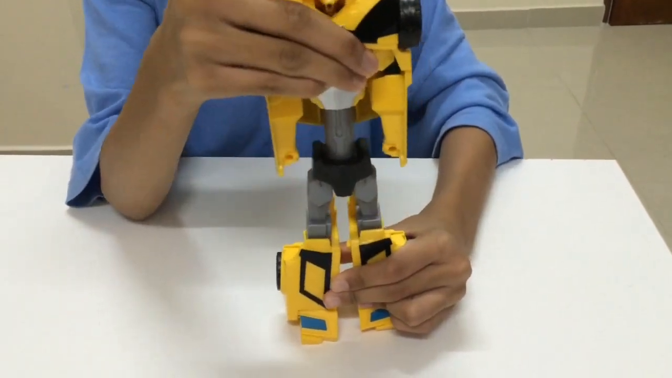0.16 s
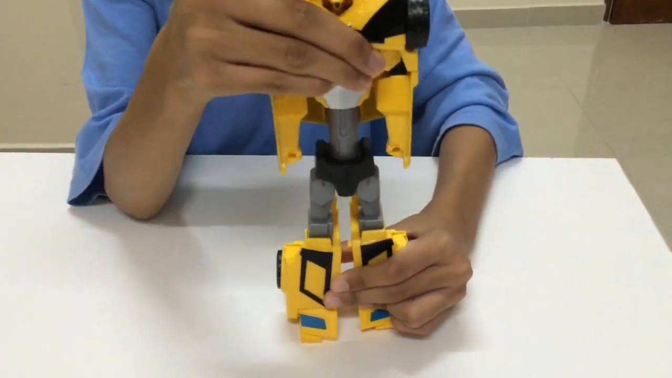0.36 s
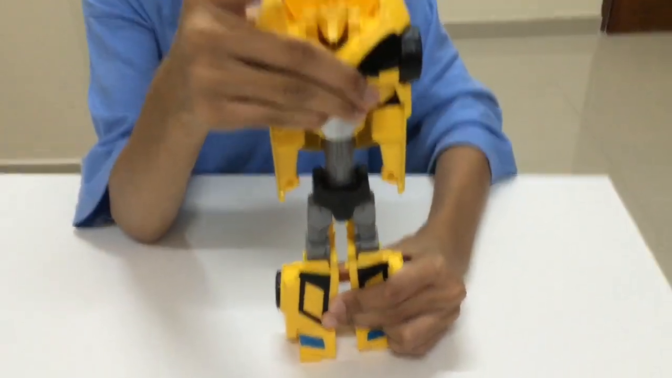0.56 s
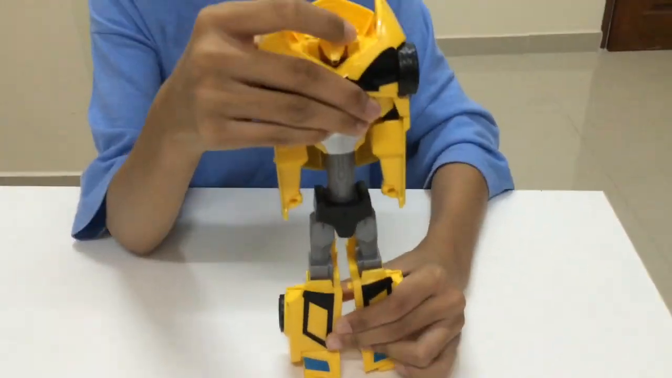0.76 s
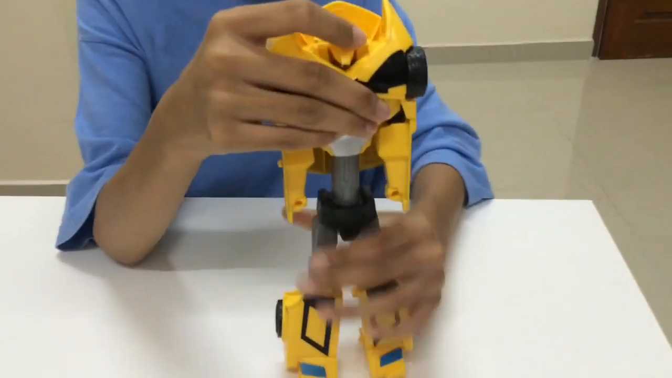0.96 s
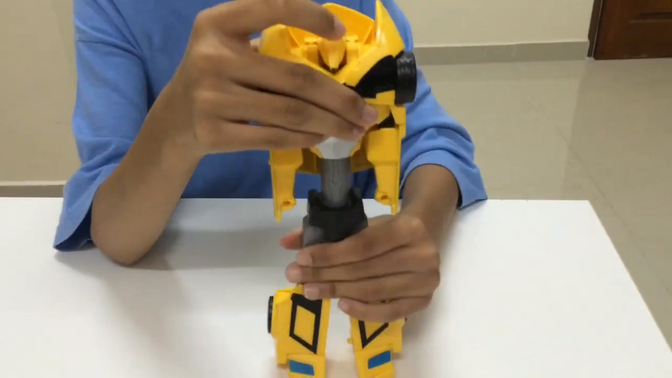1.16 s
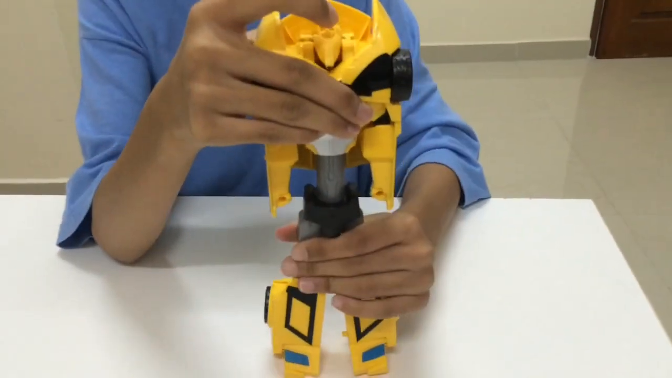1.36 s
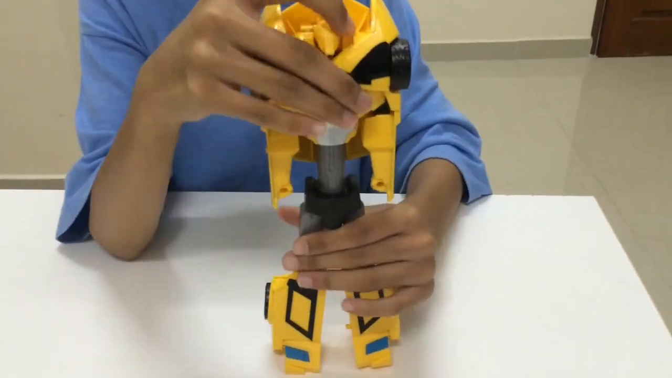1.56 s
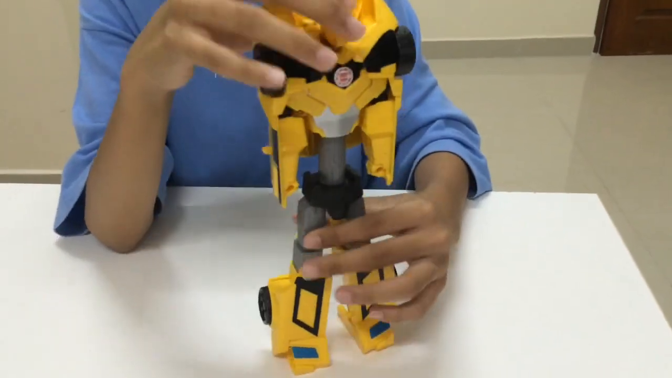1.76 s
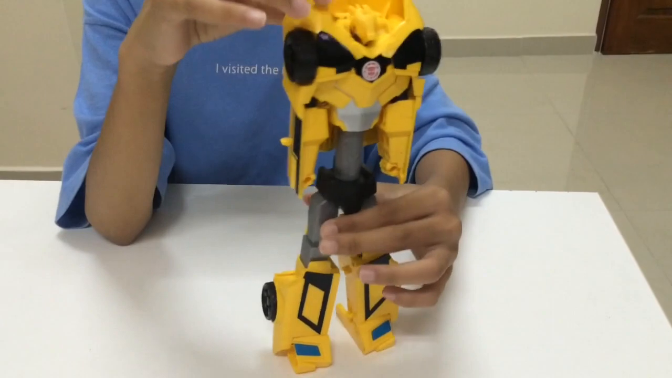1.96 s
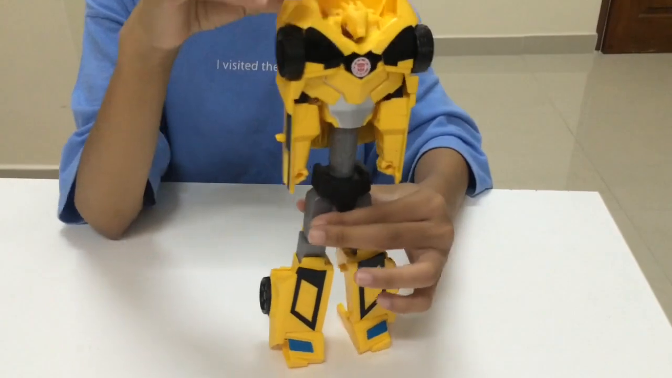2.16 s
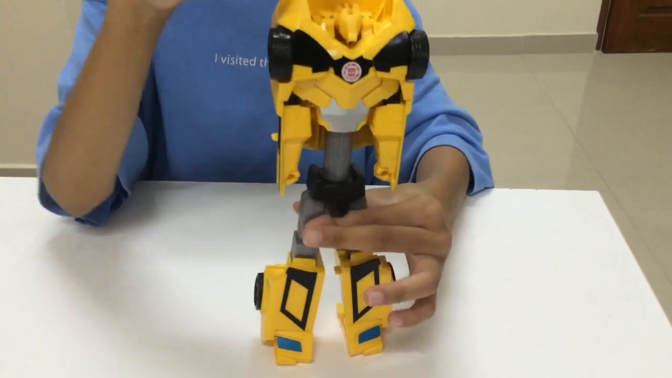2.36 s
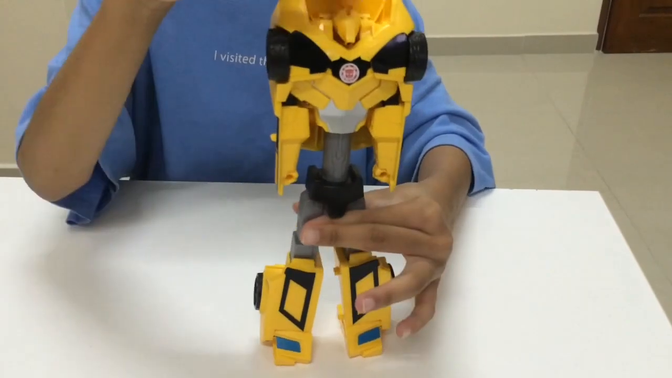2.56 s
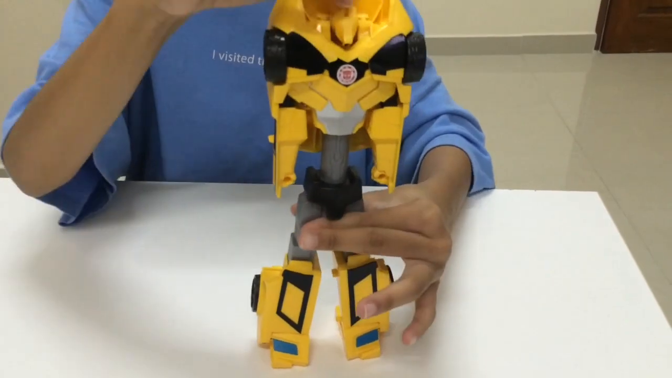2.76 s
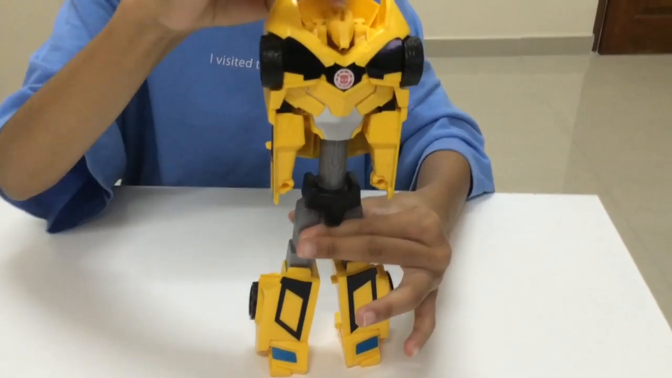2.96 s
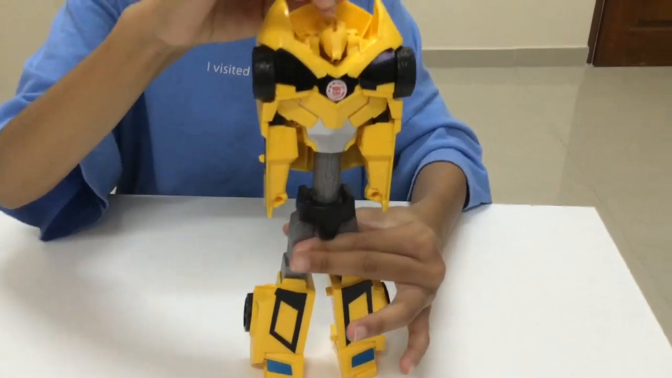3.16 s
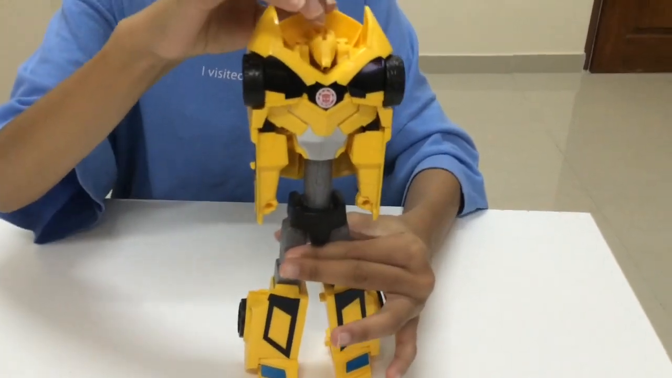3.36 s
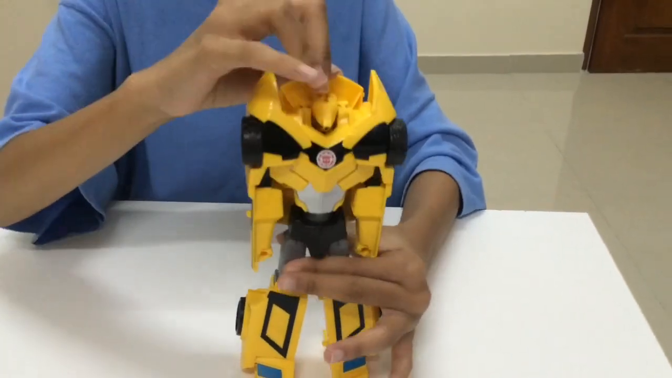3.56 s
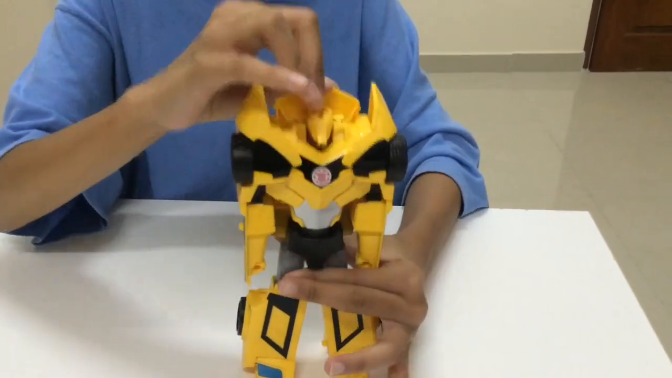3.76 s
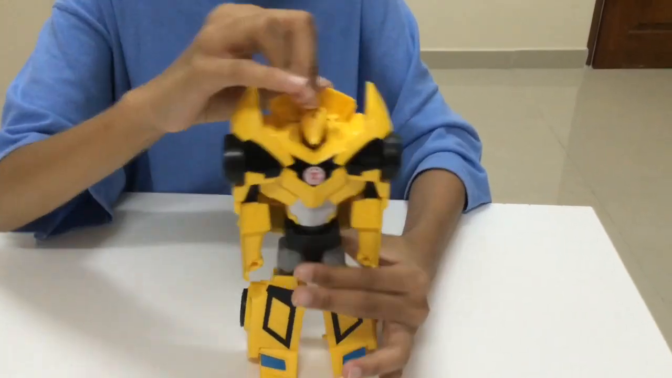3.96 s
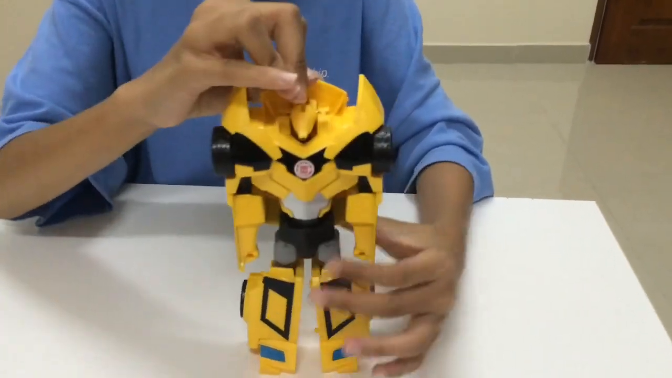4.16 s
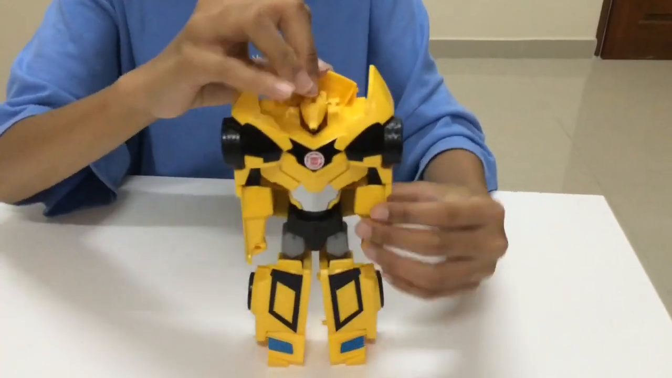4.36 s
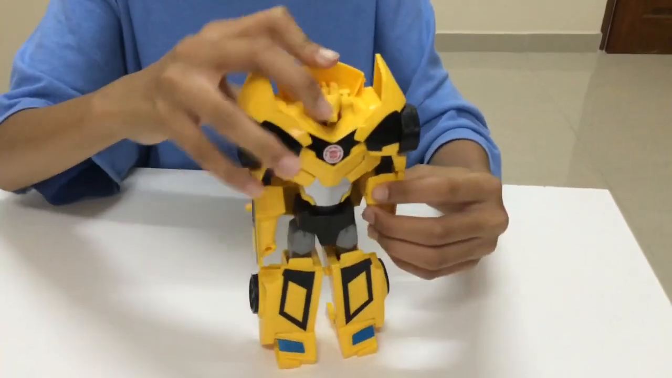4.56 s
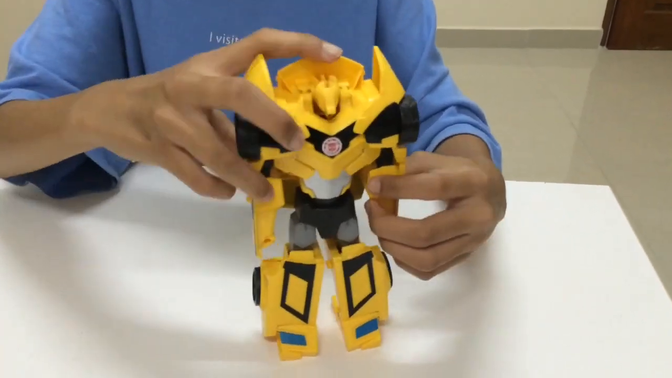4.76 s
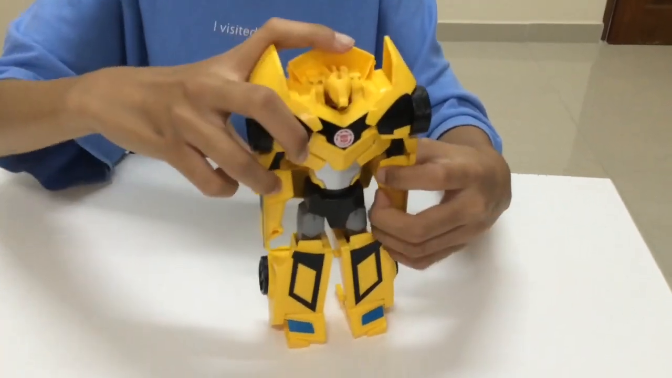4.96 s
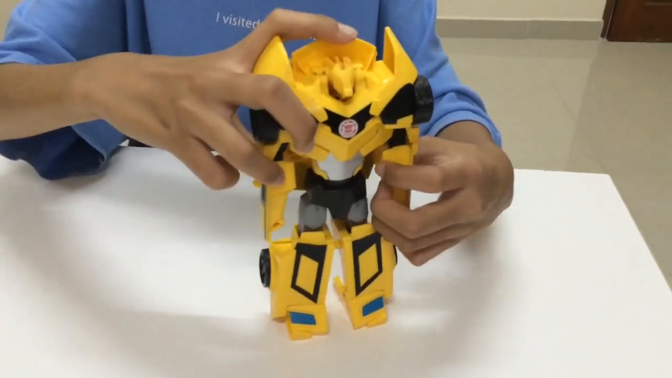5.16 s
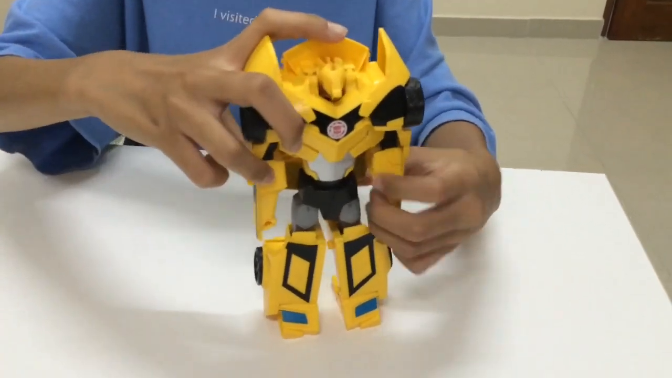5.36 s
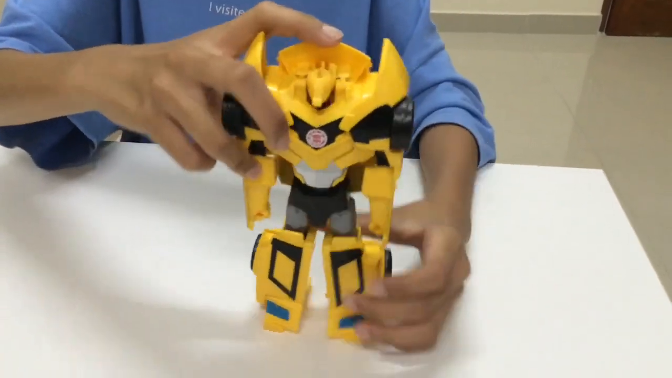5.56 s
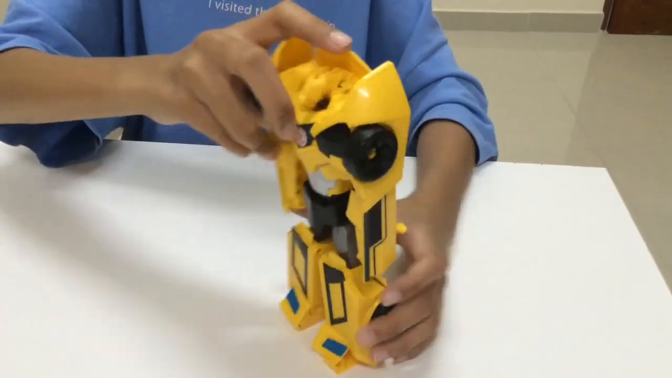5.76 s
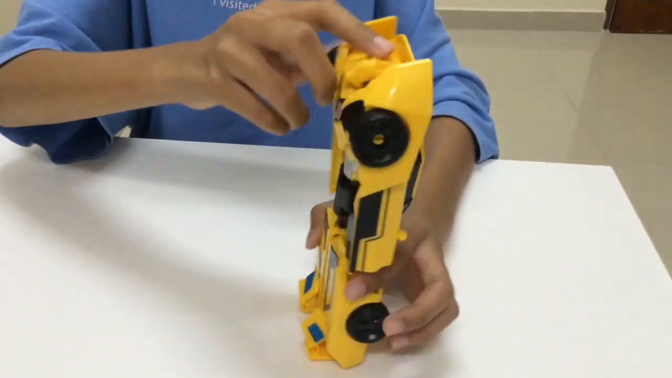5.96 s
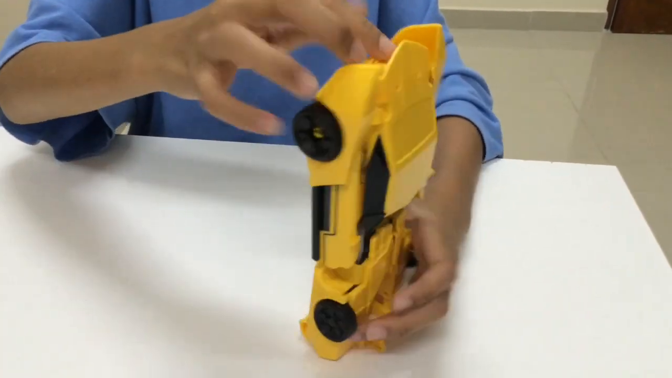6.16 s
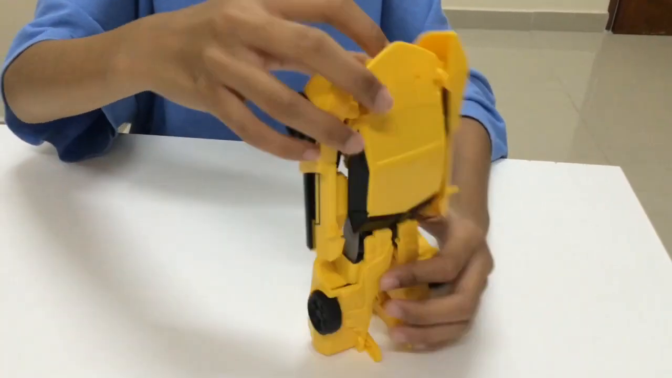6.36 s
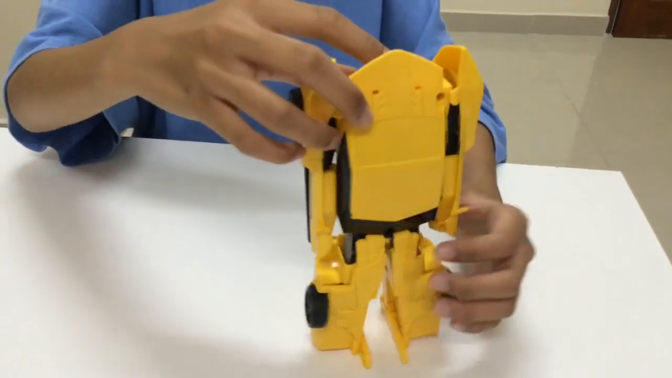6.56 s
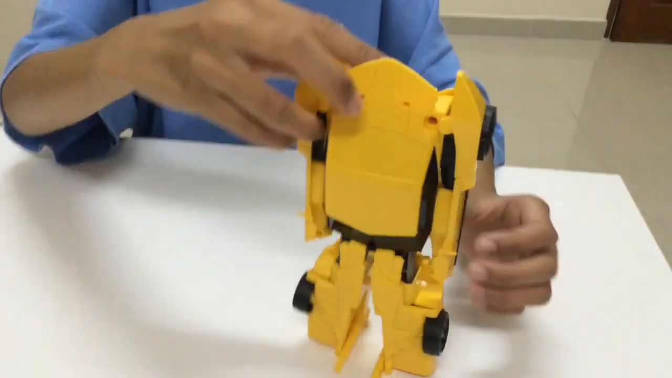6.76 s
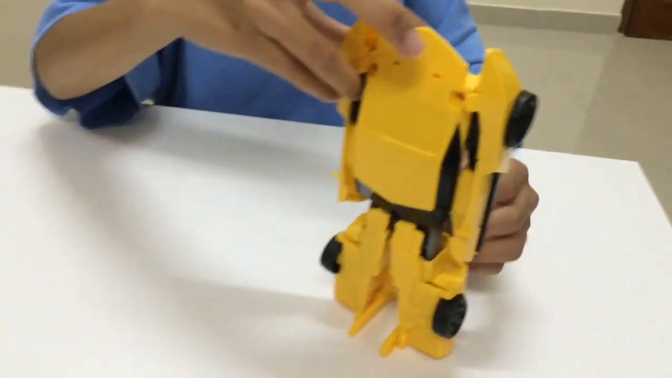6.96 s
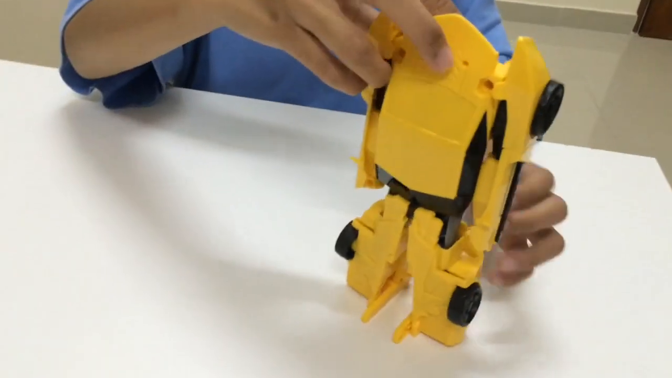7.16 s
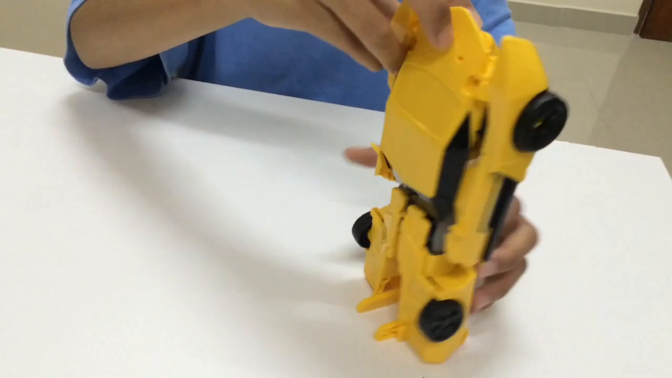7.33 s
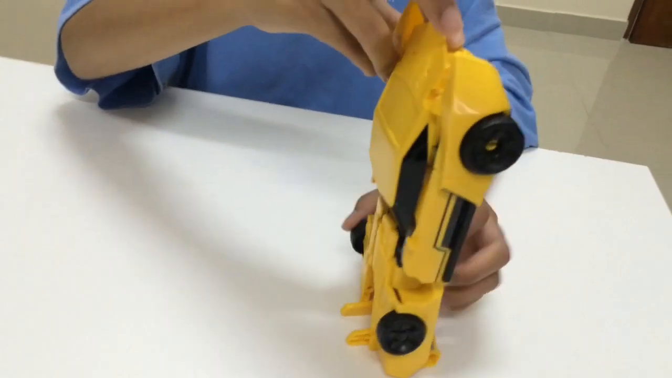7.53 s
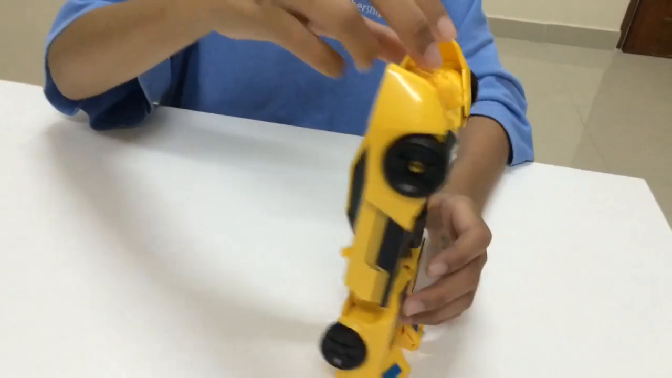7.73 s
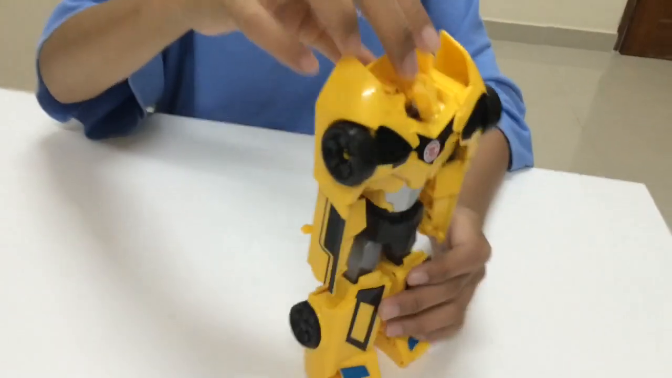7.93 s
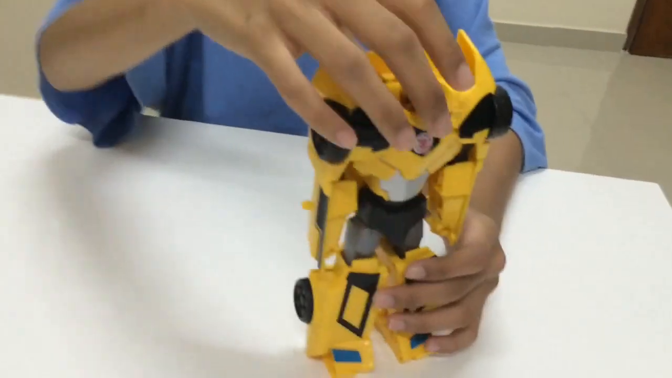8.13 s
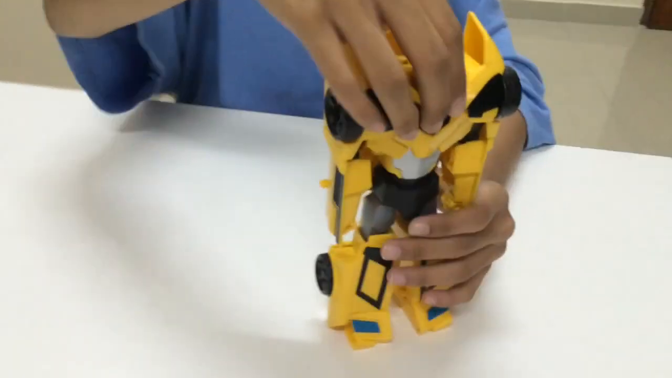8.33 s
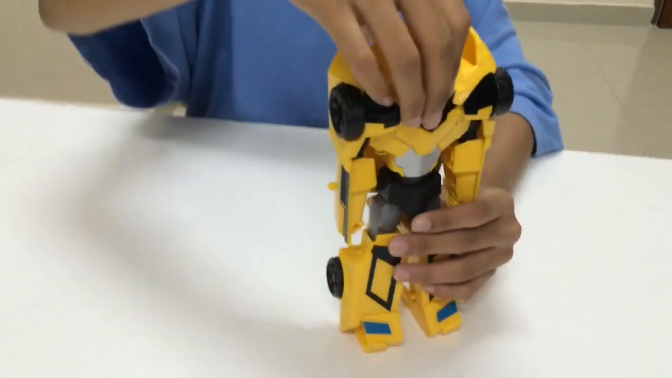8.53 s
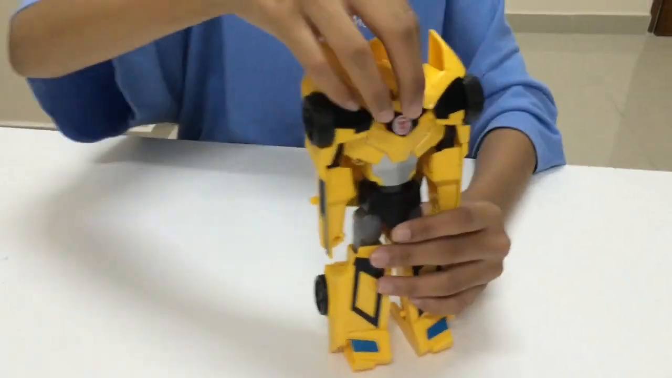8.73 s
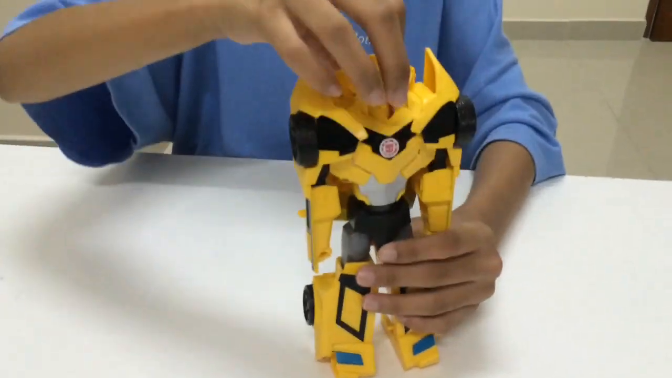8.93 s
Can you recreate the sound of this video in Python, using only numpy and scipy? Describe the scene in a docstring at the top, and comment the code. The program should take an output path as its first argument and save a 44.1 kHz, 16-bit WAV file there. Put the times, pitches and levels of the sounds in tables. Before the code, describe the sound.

Close, dry plastic clicks, scrapes and small thuds on a thin table, peaking in a sharp loud snap, then fading to sparse handling over faint hum.

```python
"""Folding a plastic toy on a table

Hands fold a hard plastic toy that stands on a thin table top in a bare tiled room.
Joints click and snap as short bursts of noise coloured by hollow shells; some leave a spring singing.
Parts scrape as grainy noise, and the feet knock and drag on the table, which booms in its low modes.
The hard room answers with noise tails over a faint hum and hiss; the microphone is close and mono."""
import sys
import numpy as np
from scipy import signal
from scipy.fft import rfft, irfft, next_fast_len
from scipy.io import wavfile
from scipy.ndimage import uniform_filter1d, map_coordinates

SR = 44100
rng = np.random.default_rng(int(sys.argv[2]) if len(sys.argv) > 2 else 0)


def master_out(mix):
    """Clip the mix to full scale and print it as 16-bit PCM to the path in sys.argv[1]."""
    frames = np.transpose(np.atleast_2d(mix))
    ceiling = np.clip(frames, -1, 1)
    pcm = np.round(ceiling * 32767).astype(np.int16)
    wavfile.write(sys.argv[1], SR, pcm)


def invert_db(level):
    """Linear amplitude ratio for a level in decibels (20 dB per decade), elementwise."""
    return 10 ** (np.asarray(level, dtype=float) / 20)


N = 400869  # length in samples, about 9 s

# Contacts of plastic parts. Each row: start in seconds, level in dB, loudest shell in Hz,
# treble of the hard edge in dB, length of the chatter in ms (held between 0.5 and 12).
CLICKS = [(.0067, -23, 3780, -11, 2.4), (0.0769, -28.5, 4600, 0.5, 3.86), (.0864, -36.5, 3100, -19, 8.9),
          (.184, -29.5, 3100, -4, 14), (0.1935, -22.5, 1320, -9, 13.4), (0.2145, -11, 4740, 1.5, 3.9),
          (.223, -22, 3000, 2, 6.8), (0.2369, -16.5, 4230, -3, 3.9), (0.2455, -23, 3100, -10, 10),
          (0.2551, -17.5, 3100, -22, 6.1), (0.3141, -33.5, 2670, -17.5, 5.9), (.5195, -45, 1380, -5, 2.3),
          (.7083, -44.5, 3200, -8.5, 4.5), (0.7352, -30.5, 3100, -20.5, 6.2), (0.7724, -37, 1890, -20, 3.1),
          (0.917, -14, 3540, -11, 6.7), (.9424, -29, 3200, -28, 13), (0.9582, -20, 2360, -23, 6.5),
          (.965, -29, 2450, -26, 11), (0.9998, -33, 2110, -20, 12), (1.0444, -19, 3470, -12, 5.4),
          (1.0632, -33.5, 3490, -19, 3.5), (1.112, -31.5, 3620, -24, 5.6),
          (1.121, -26.5, 4010, -12.5, 2.26), (1.2059, -25, 3620, -12, 5.7), (1.2242, -21, 1236, -14, 14.4),
          (1.24, -25, 2480, -38, 11), (1.2526, -25, 1310, -40, 9.9), (1.3123, -27.5, 2390, -39, 9),
          (1.3415, -31, 2400, -27, 5.6), (1.6983, -33, 4050, -18.5, 13.8), (1.9551, -49, 3360, -10, 3.1),
          (2.029, -31, 2000, -9, 7.3), (2.0342, -21.5, 3710, -6, 10), (2.0978, -16.5, 2280, -4, 6.9),
          (2.1668, -37, 3190, -25, 7.6), (2.335, -48, 3500, -15, 2), (2.3787, -41.5, 4200, -7, 2.2),
          (2.4617, -33.5, 2220, -32, 4.9), (2.546, -21.5, 3705, -7, 5.4), (2.6815, -48.5, 2800, -16, 3.5),
          (2.7424, -48, 2160, -25, 8.2), (3.2367, -29, 2220, -18.5, 4.9), (3.25, -32, 1320, -10.5, 12),
          (3.3313, -36, 2700, -21, 1.3), (3.574, -23, 3000, -7, 12), (3.581, -7, 3730, -15, 8.57),
          (3.5905, -3, 1620, -6, 5.3), (3.5962, -2, 4100, -16, 1.7), (3.599, -11.5, 3000, 9.5, 4.7),
          (3.6245, 2.5, 4000, -3.5, 2.3), (3.838, -19, 4550, -1.5, 4.85), (3.8564, -9.5, 3600, 1, 2.3),
          (3.8647, -7, 4230, -4, 1.77), (3.89, -25, 2770, -16, 1.6), (3.9567, -39, 2280, -8, 2.7),
          (4.0125, -25, 1590, -11, 3.15), (4.0227, -26, 1980, -33, 8.3), (4.032, -22, 1580, -16, 9.6),
          (4.0485, -23, 4740, -16.5, 2.7), (4.0539, -26.5, 3120, -25.5, 7.9),
          (4.0882, -23.5, 3130, -15, 6.8), (4.1025, -17, 4740, -17.5, 7.7), (4.1123, -23.5, 4440, -18, 2.4),
          (4.1222, -21, 3100, -21, 3.2), (4.1478, -31, 4180, -21, 1.8), (4.159, -34, 4480, -27, 2.9),
          (4.2308, -27.5, 2280, -33, 5.6), (4.2408, -23, 3830, -19, 2.42), (4.452, -22.5, 2650, -42, 7.5),
          (4.4622, -34, 2700, -42, 11), (4.6007, -32.5, 4310, -11.5, 4.7), (4.665, -38, 4500, -15, 2.7),
          (4.6735, -41, 4440, -16, 2.2), (4.7258, -22, 3100, -20, 2.2), (4.7492, -28, 4310, -18, 6.2),
          (4.759, -24, 3100, -19, 3.7), (4.7663, -19, 2820, -28, 3.8), (4.775, -21.5, 2800, -22, 2.85),
          (4.8503, -28, 2180, -43, 14), (4.8625, -33, 1770, -32.5, 5.8), (4.97, -39, 4370, -16, 11),
          (4.9901, -23.5, 3270, -10, 7.5), (5.0033, -18, 4270, -23, 1.6), (5.0089, -24.5, 4330, -14.5, 5.7),
          (5.1085, -43.5, 1920, -15, 4.4), (5.1557, -33.5, 1755, -17, 1.62),
          (5.2687, -20.5, 3100, -12.5, 3.2), (5.44, -20, 5540, -0.5, 2.2), (5.52, -39, 3060, -24.5, 3.3),
          (5.685, -32, 3270, -21, 10), (5.8229, -26.5, 3790, -21, 1.6), (5.865, -30.5, 3240, -14, 4.8),
          (5.9156, -20, 3100, -10, 3.6), (5.92, -22, 2950, -14, 4.9), (5.9377, -25.5, 3500, -15, 3.36),
          (5.9946, -35, 3140, -25, 6.8), (6.02, -33, 4200, -18, 12), (6.033, -31, 3100, -26, 14),
          (6.0475, -27, 3300, -30, 5.8), (6.1217, -16.5, 4820, -11, 3.4), (6.13, -20.5, 3410, -7, 8.1),
          (6.1363, -26, 3320, -11, 6.3), (6.1569, -24.5, 4300, -21, 3.7), (6.1864, -23, 3320, -10, 5),
          (6.228, -22.5, 3430, -10.5, 18), (6.237, -10.5, 3380, -12, 0.59), (6.255, -29.5, 3200, -3, 11),
          (6.3087, -38.5, 3270, -8, 4.4), (6.3648, -39, 3140, -16.5, 2.8), (6.4308, -40, 1940, -12.5, 6),
          (6.4661, -32.5, 2180, -29.5, 14), (6.4853, -27, 1720, -19, 13), (6.5171, -27, 2700, -23, 4.7),
          (6.537, -38, 3270, -27, 1.7), (6.5596, -36, 3300, -19, 3.1), (6.672, -46, 3450, -19, 5.2),
          (6.732, -33.5, 1810, -19.5, 4.6), (7.1436, -42.5, 6150, -5, 12), (7.1839, -41, 3200, -16, 2.8),
          (7.2193, -34, 1560, 2, 4.8), (7.238, -26, 4860, -21, 1.7), (7.2535, -23.5, 2350, -6.5, 3),
          (7.3012, -36, 4050, -12, 4.7), (7.3153, -31.5, 3440, -17.5, 3.1), (7.3742, -46, 1980, -18, 9),
          (7.437, -37.5, 4870, -12, 4.3), (7.4556, -35.5, 1940, -23, 9.9), (7.517, -33, 3940, -11, 4),
          (7.5338, -42, 2626, -11, 6), (7.5893, -18.5, 3150, -14, 3), (7.6434, -35, 3170, -12, 4.4),
          (7.6572, -22.5, 3280, -2.5, 1.7), (7.813, -31, 4740, -23, 2.07), (8.1191, -39.5, 4740, -16, 6.45),
          (8.3697, -40, 3370, -17, 2.6), (8.563, -42.5, 1678, -17.5, 2.8), (8.7809, -37.5, 1680, -22, 10),
          (8.8, -35.5, 3200, -24, 1.17), (8.8496, -37.5, 1420, -19.5, 7.6), (8.9809, -16, 5270, -36, 2.2)]
# Knocks passed into the table. Each row: start in seconds, base level in dB,
# boom (middle low modes) in dB, thud (lowest modes) in dB.
KNOCKS = [(0.19, -17, -7.5, -13), (0.257, -23.5, 1.5, -6), (0.825, -34.5, -6, -20), (0.955, -37, -7, -2.5),
          (1.001, -42, -17, -19), (1.021, -32.5, -25, -14), (1.214, -38, 4, -8), (1.224, -12.5, -21, -7.5),
          (2.026, -23.5, -6.5, -24), (2.097, -33, -12, -21), (2.267, -41, -8, -6), (2.462, -42, 3, -19),
          (2.544, -34, -12, -23.5), (2.741, -48, -7, -14), (3.234, -37, 3, -10), (3.249, -29.5, -17, -4.5),
          (3.553, -35, -11, -23), (3.582, -19, -19, -25.5), (3.592, -8.5, -20, -21.5),
          (3.603, -10.5, -20, -20.5), (3.838, -22.5, -34.5, -17), (3.861, -29.5, -10, -18.5),
          (4.013, -23.5, -9, -18), (4.078, -22, -40.5, -14), (4.228, -29.5, -30.5, -20),
          (4.451, -27.5, 0, -21), (4.722, -43.5, 2, -3), (4.762, -34, 0, -15), (4.836, -41, -1, -18),
          (4.852, -26.5, -20, -19), (4.982, -35.5, -4, -5), (5.007, -35.5, -6.5, -17.5),
          (5.27, -43.5, -12.5, -5), (5.657, -30.5, -15.5, -12), (5.68, -29.5, -21, -20),
          (5.825, -37, -23, -7), (5.91, -28.5, 0.5, -0.5), (6.019, -35, -1, -15), (6.12, -41, 3, -18),
          (6.137, -30, -22, -11), (6.245, -45.5, 11, -10), (6.466, -38.5, 5.5, -23), (6.478, -30, -3.5, -9),
          (6.722, -43, 0, -9.5), (7.215, -45.5, 10, 2.5), (7.255, -34.5, -8, -10), (7.449, -41.5, -13, -14),
          (7.655, -42, -14, -8.5), (7.825, -42.5, -10, -16.5), (8.78, -36, 11, -27), (8.849, -35.5, 9, -13),
          (8.939, -49, 13, -13), (8.961, -38.5, 12, -15)]
# Hollow plastic shells, which die away fast.
# Each row: pitch in Hz, level in dB, time to fall 60 dB in seconds before any widening.
SHELL_MODES = [(1580, 7, 0.002), (2000, 13, 0.0049), (2450, 5.5, 0.0025), (3100, 12.5, 0.0093),
               (3910, 3, 0.0015), (4825, 11, 0.015), (5395, 0.5, 0.002), (7400, 1.5, 0.003)]
# Ways the table top vibrates.
# Each row: pitch in Hz, level in dB, time to fall 60 dB in seconds before any widening.
TABLE_MODES = [(62.8, -2, 0.15), (112.9, 0.5, .25), (159.5, 0.5, 0.21), (195.6, -0.5, .2), (264, -3, 0.095),
               (396, -6.5, 0.051), (455.5, -1.5, 0.074), (605.3, -5.5, 0.072), (651.6, -7.5, 0.074),
               (759.6, -7.5, 0.045), (982, -12, .07), (1148, -13.5, 0.047), (1390, -15, 0.081)]
# Tone colour of the scraping; only the shape counts. Each row: frequency in Hz, level in dB.
SCRAPE_COLOUR = [(530, -25.5), (900, 3.5), (1100, -3.5), (1420, -5.5), (2610, -4), (3120, -5.5),
                 (4720, -8.5), (7000, -20), (9100, -54), (15400, -120)]
# Tone colour of the room hum; only the shape counts. Each row: frequency in Hz, level in dB.
HUM_COLOUR = [(15, -54), (25, -35.5), (87, -13), (161, -23.5), (195, -0.5), (263, -12.5), (301, -11.5),
              (476, -19.5), (887, -21.5), (1040, -19.5), (1650, -31.5), (2480, -32.5), (2760, -37),
              (14800, -45), (16000, -64)]
# How long the room rings. Each row: frequency in Hz, time to fall 60 dB in seconds.
ROOM_DECAY = [(150, 0.32), (600, 0.34), (3000, 0.25), (8000, 0.21), (15000, 0.13)]
# A small steel spring inside sings after some snaps.
# Each row: start in seconds, level in dB, rise time in seconds, time to fall 60 dB in seconds.
SPRING_NOTES = [(2.101, -57, .002, .36), (2.547, -60, .002, .34), (6.008, -54, .006, .13)]
# The two tones of the spring, in Hz.
SPRING_HZ = [8100, 8300]
# Short rubs of one joint. Each row: start in seconds, end in seconds, centre in Hz,
# width in octaves, level in dB, lateness of the swell (a power, no unit).
RUBS = [(2.397, 2.45, 8650, 0.15, -58, 0.88), (3.526, 3.596, 3980, 1.72, -24, 4.3),
        (7.603, 7.67, 2970, 0.053, -56, 0.29), (7.745, 7.79, 2230, 0.29, -53.5, .6),
        (8.103, 8.19, 3820, 0.086, -65.5, 0.42), (5.65, 5.687, 1110, 1.2, -45, 0.15),
        (7.381, 7.433, 4230, 0.066, -65, .4)]
# Shoves of the toy over the table. Each row: peak in seconds, time to fall 20 dB in seconds
# (negative: slow rise, quick fall), scrape in dB, drag in dB, boom in dB.
SHOVES = [(.0, 0.0383, -38, -41.5, -26), (0.231, 0.0334, -34, -29.5, -26.5), (.42, .1, -60, -74, -59),
          (.76, 0.08, -60, -53.5, -59), (.95, 0.4, -56, -57, -59.5), (1.04, 0.1, -49, -59, -45),
          (1.245, -0.04, -41, -39, -33), (1.32, -0.13, -51.5, -65, -52), (1.69, -1.03, -63, -64, -68),
          (2.03, -0.1, -61, -71, -56), (2.48, 0.2, -63.5, -54, -53), (3.26, .05, -44.5, -55, -35),
          (3.622, 0.22, -46, -42.5, -34.5), (3.87, 0.05, -34.5, -34, -38.5), (4.1, 0.07, -39, -43, -39.5),
          (4.245, -0.3, -49, -58, -55.5), (4.47, -0.23, -58, -55.5, -50), (4.731, 0.05, -48, -63, -48),
          (4.859, 0.0819, -46.5, -47, -36.5), (5.039, 0.13, -55, -67, -46.5), (5.52, .08, -62, -67.5, -57),
          (5.675, .08, -55.5, -44, -54.5), (5.73, 0.06, -51.5, -54, -61), (5.92, 0.12, -57, -53, -50),
          (6.049, 0.3, -60, -65, -41.5), (6.17, 0.03, -53, -41.5, -41), (6.235, -0.01, -57, -49, -31.5),
          (6.529, 0.28, -57, -59.5, -42.5), (6.73, -0.1, -61, -68, -58), (6.95, 0.04, -72, -67, -54),
          (7.24, 0.2, -55, -61.5, -46.5), (7.93, 0.08, -71, -69, -40), (8.05, 0.1, -63.5, -58, -49),
          (8.16, 0.3, -66, -61, -46), (8.83, 0.27, -55, -55.5, -43.5), (8.989, 0.11, -54.5, -57, -36.5)]
# Fingers moving on the toy between the shoves.
# Each row: time in seconds, scrape in dB before its trim, treble of the scrape in dB.
HANDLING = [(0, -60, -60), (.4, -61, -74), (.66, -73, -76), (.95, -57, -68), (1.45, -78, -77),
            (1.97, -71, -76.5), (2.4, -61.5, -72), (2.7, -73, -79), (3.4, -92, -83), (3.72, -56, -62),
            (3.99, -61, -70), (4.2, -65, -73.5), (4.4, -71, -80), (4.75, -55.5, -61), (5.15, -76, -80),
            (5.6, -77, -78), (6.1, -58, -67.5), (6.6, -65, -76), (7.0, -67.5, -65), (7.35, -69, -75.5),
            (7.65, -60.5, -69.5), (8.1, -67, -70), (8.3, -75, -74.5), (8.7, -74.5, -75), (9.09, -74, -72)]
# The whole table rocks after a heavy push. Each row: peak in seconds,
# time to fall 20 dB in seconds (negative: slow rise, quick fall), level in dB.
SWAYS = [(.0, 0.04, -30.5), (.24, 0.34, -40.5), (1.24, 0.15, -38.5), (3.3, -0.47, -43), (3.62, 0.14, -40),
         (3.9, 0.03, -31), (4.1, 0.47, -44), (5.72, 0.45, -47.5), (5.93, 0.26, -44), (6.18, 0.34, -47.5),
         (7.24, 0.66, -49), (8.81, 0.5, -49)]

LEAD = 128  # samples of silence kept ahead of a contact, so its filtered start is not cut off
EDGE_TOP_DB = -10  # 13 kHz part of a hard edge against its 8 kHz part, for soft contacts
HARD_FROM_DB, HARD_SLOPE = -19.5, 0.57  # above this level the 13 kHz part gains, dB per dB
DULL_FROM_DB, DULL_SLOPE = -16, 0.27  # below this edge a contact wakes other shells less, dB per dB
TICK_TRIES = 170  # chances for a tick in all
TICK_BUSY_DB, TICK_OVER_DB = -61.5, 20  # handling level at which all sound; most a tick is above it
THUMP_DB, THUMP_HZ, THUMP_T60 = -3, 329, .018  # the blunt push in a knock; t60 in seconds
BETWEEN = .35  # share of a negative boom dB that the mode between boom and knock follows
RISE_SHARE = 0.51  # a swell's rise takes this share of the time of its fall
DRAG_DB, FIZZ_DB = -3.5, -19  # drag against the fingers' scrape; treble of a shove under its scrape
REST_BOOM_DB, REST_SWAY_DB = -60, -59  # the table never rests quite still
SWAY_FOLLOWS = .3  # dB of resting sway per dB of handling
HUM_DB = -59
MIC_LOW_HZ, MIC_TOP_HZ = 45, 15500


def clicks():
    """Each contact is a few ms of chatter, coloured by the shell it hits hardest; hard edges add treble."""
    contacts = np.vstack([CLICKS, ticks()])
    start, db, centre_hz, edge_db, ms = contacts.T[:, :, None]
    t = np.arange(1024) / SR
    f = np.fft.rfftfreq(1024, 1 / SR) + 1

    def band(hz, octaves):
        return np.exp(-.5 * (np.log2(f / hz) / octaves) ** 2)

    nearest_shell = 1 / (1 + (4.0 * (f / centre_hz - centre_hz / f)) ** 2)
    other_shells = invert_db(-9.5) * np.abs(resonances(SHELL_MODES, widen=1.2)(f))
    other_shells = other_shells / (1 + (f / 5500) ** 6) / (1 + (900 / f) ** 4)  # mid range only
    others_gain = invert_db(DULL_SLOPE * np.minimum(edge_db - DULL_FROM_DB, 0))
    top_gain = invert_db(EDGE_TOP_DB + HARD_SLOPE * np.maximum(db - HARD_FROM_DB, 0))
    edge = band(hz=8200, octaves=0.36) + top_gain * band(hz=12900, octaves=0.24)
    colour = nearest_shell + others_gain * other_shells + invert_db(edge_db) * edge

    u = np.maximum(t - LEAD / SR, 0) / np.clip(ms / 1000, .0005, .012)
    shape = u ** 0.72 * (np.exp(-3 * u) + .08 * np.exp(-u))  # quick rise, fast fall, faint tail
    chatter = rng.standard_normal((len(start), len(t))) * shape
    hits = irfft(rfft(chatter) * colour)
    hits *= invert_db(db - 1.5) / np.abs(hits).max(axis=1, keepdims=True)
    out = np.zeros(N + SR)
    for s, hit in zip(start[:, 0], hits):
        out[round(s * SR):][:len(t)] += hit
    return out[LEAD:][:N]


def ticks():
    """Loose parts tick by chance, more and louder where the fingers are busy; rows as in CLICKS."""
    start, keep, size, pitch, edge, length = rng.random((TICK_TRIES, 6)).T
    start = start * (N / SR - .03)
    busy_db = np.interp(start, *np.transpose(HANDLING)[:2])
    sounds = keep < invert_db(busy_db - TICK_BUSY_DB)
    db = np.where(sounds, busy_db + TICK_OVER_DB - 8 * size, -200)  # -200: stays silent
    return np.c_[start, db, 1400 * 3.3 ** pitch, -28 + 17 * edge, 2.2 + 6 * length]


def knocks():
    """A blunt push sets all table modes ringing; each knock has its own share of low modes."""
    out = np.zeros(N + SR)
    t = np.arange(SR // 4) / SR
    hz = np.transpose(TABLE_MODES)[0]
    push = invert_db(THUMP_DB) * ring([(THUMP_HZ, 0, THUMP_T60)], np.zeros(1), t, attack=0.006)
    for s, db, boom_db, thud_db in KNOCKS:
        between_db = BETWEEN * min(boom_db, 0)
        share_db = np.select([hz < 125, hz < 230, hz < 330], [thud_db, boom_db, between_db], 0)
        share_db = share_db + rng.normal(0, 1.7, len(hz))
        loudest_db = max(0, boom_db, thud_db)
        # low modes take longer to get going
        ringing = ring(TABLE_MODES, share_db, t, attack=0.71 / hz[:, None])
        knock = invert_db(boom_db - loudest_db) * push + ringing
        out[round(s * SR):][:len(t)] += invert_db(db + loudest_db - 1.5) * knock
    return out[:N]


def sliding():
    """Parts rub on each other and the feet drag: grainy noise shakes the shells and the table modes."""
    t = np.arange(N) / SR
    s, *columns = np.transpose(HANDLING)
    fingers, treble = [invert_db(np.interp(t, s, c)) for c in columns]
    rubbing, dragging, shaking = swells(SHOVES)

    def scrape_colour(f):
        return (.5 + resonances(SHELL_MODES, widen=.8)(f)) * invert_db(along(SCRAPE_COLOUR, f))

    def fizz_colour(f):
        return invert_db(along([(4000, -44.5), (6500, -0.5), (15000, -4)], f))

    scrape = unit(filtered(patchy(grit(rate=1300, spread_db=3.5), depth_db=5.5), scrape_colour))
    fizz = unit(filtered(patchy(grit(rate=4800, spread_db=2.5), depth_db=1.5), fizz_colour))
    drag = unit(filtered(grit(rate=550, spread_db=4.0), resonances(TABLE_MODES[4:], widen=2.3)))
    boom_modes = resonances(TABLE_MODES[2:4], widen=2.5)
    sway_modes = resonances(TABLE_MODES[:2], widen=3.0)
    boom = unit(filtered(rng.standard_normal(N), lambda f: boom_modes(f) ** 2))
    sway = unit(filtered(rng.standard_normal(N), lambda f: sway_modes(f) ** 2))
    # the lowest mode, never quite steady
    rock = unit(np.sin(2 * np.pi * TABLE_MODES[0][0] * t + 0.9 * wobble(10)))

    jerk = invert_db(1.3 * wobble(35))  # the hand moves in small jerks
    scrape_gain = jerk * (invert_db(-3.5 + 2.0 * wobble(14)) * fingers + rubbing)
    fizz_gain = jerk * (treble + invert_db(FIZZ_DB) * rubbing)
    drag_gain = invert_db(1.5 * wobble(25)) * (invert_db(DRAG_DB) * fingers + dragging)
    boom_gain = invert_db(REST_BOOM_DB + 1.6 * wobble(8)) + shaking
    busy = (fingers / np.median(fingers)) ** SWAY_FOLLOWS
    sway_gain = busy * invert_db(REST_SWAY_DB + 4.3 * wobble(9))
    friction = scrape_gain * scrape + fizz_gain * fizz + drag_gain * drag
    return friction + boom_gain * boom + sway_gain * sway + swells(SWAYS)[0] * rock


def grit(rate, spread_db):
    """Stick-slip grains of uneven size, rate a second on average, on a bed of fine friction."""
    slips = (rng.random(N) < rate / SR) * invert_db(spread_db * rng.exponential(size=N))
    return unit(slips * rng.standard_normal(N)) + 1.7 * rng.standard_normal(N)


def patchy(x, depth_db):
    """Each slip shakes another shell: random patches of gain over frequency and time."""
    z = signal.stft(x, nperseg=256)[2]
    field = uniform_filter1d(rng.standard_normal(z.shape), size=4, axis=0)
    field = uniform_filter1d(field, size=5, axis=1)
    return signal.istft(z * invert_db(depth_db * unit(field)), nperseg=256)[1][:N]


def swells(rows):
    """Sum of rises and falls that are straight lines in dB, one gain curve per dB column."""
    t = np.arange(N) / SR
    out = np.zeros((len(rows[0]) - 2, N))
    for peak, fall, *db in rows:
        near = slice(max(0, round((peak - .5) * SR)), round((peak + .5) * SR))
        late = (t[near] - peak) / fall
        out[:, near] += invert_db(np.c_[db] - 20 * np.maximum(late, -late / RISE_SHARE))
    return out


def rubs():
    """A joint rubs: friction noise in one band under a quick swell."""
    out = np.zeros(N)
    for start, end, hz, octaves, db, late in RUBS:
        u = np.linspace(0, 1, round((end - start) * SR))

        def band(f):
            return np.exp(-.5 * (np.log2((f + 1) / hz) / octaves) ** 2)

        noise = unit(filtered(rng.standard_normal(8192), band))
        swell = u ** abs(late) * np.sqrt(np.minimum(1, 8 * (1 - u)))  # lets go quickly
        out[round(start * SR):][:len(u)] += invert_db(db) * swell * noise[:len(u)]
    return out


def spring():
    """The steel spring sings two close, unsteady tones that die away."""
    out = np.zeros(N + SR)
    t = np.arange(SR // 3) / SR
    for s, db, rise, t60 in SPRING_NOTES:
        drift = .035 * np.cumsum(rng.standard_normal((2, len(t))), axis=1)
        tones = np.sin(2 * np.pi * np.c_[SPRING_HZ] * t + drift).sum(axis=0)
        fade = invert_db(db - 60 * t / t60) * (1 - np.exp(-t / rise))
        out[round(s * SR):][:len(t)] += fade * tones
    return out[:N]


def room(x):
    """Hard walls answer with a noise tail, new each fifth of a second; each frequency dies at its own speed."""
    out = np.zeros(N + 2 * SR)
    step = SR // 5
    for start in range(0, N, step):
        hz, t, z = signal.stft(rng.standard_normal(SR // 2), SR, nperseg=256)
        decay = invert_db(-60 * t / along(ROOM_DECAY, hz)[:, None])
        tail = signal.istft(z * decay, SR, nperseg=256)[1]
        wet = signal.fftconvolve(x[start:start + step], tail / np.linalg.norm(tail))
        out[start + round(.005 * SR):][:len(wet)] += wet  # the answer starts 5 ms late
    return out[:N]


def hum():
    """Room tone: coloured noise whose level wavers slightly."""
    noise = filtered(rng.standard_normal(N), lambda f: invert_db(along(HUM_COLOUR, f)))
    return invert_db(HUM_DB + 0.62 * wobble(2.5)) * unit(noise)


def resonances(modes, widen):
    """How (Hz, dB, t60) modes answer a lasting force; widen broadens each peak."""
    def response(f):
        total = 0
        for k, (hz, db, t60) in enumerate(modes):
            width = widen * np.log(1000) / np.pi / t60  # faster decay, broader peak
            peak = 1j * f * width / (hz * hz - f * f + 1j * f * width)
            total = total + (-1) ** k * invert_db(db) * peak
        return total
    return response


def ring(modes, gain_db, t, attack):
    """Modes set off together and dying away, scaled to a peak of 1."""
    hz, db, t60 = np.transpose(modes)[:, :, None]
    fade = invert_db(db + gain_db[:, None] - 60 * t / t60) * (1 - np.exp(-t / attack))
    x = np.sum(fade * np.sin(2 * np.pi * hz * t), axis=0)
    return x / np.abs(x).max()


def unit(x):
    """Scaled to rms 1."""
    return x / np.sqrt(np.mean(x ** 2) + 1e-20)


def along(points, hz):
    """Reads between (Hz, value) points on a log frequency axis."""
    f, v = np.transpose(points)
    return np.interp(np.log(hz + 1), np.log(f + 1), v)


def wobble(rate):
    """A smooth random curve, rate knots a second."""
    knots = rng.standard_normal(int(N * rate / SR) + 4)
    return map_coordinates(knots, [np.arange(N) * rate / SR])


def filtered(x, response):
    """Filters x by a response given as a function of frequency."""
    m = next_fast_len(len(x) + 8192)
    return irfft(rfft(x, m) * response(np.fft.rfftfreq(m, 1 / SR)), m)[:len(x)]


def scene():
    """The toy and table, their echo in the room, and the room tone."""
    toy = clicks() + spring() + rubs() + knocks() + sliding()
    return (toy + invert_db(-10) * room(toy) + hum())[None]


def low_pass(x):
    """Removes everything above the highest recorded frequency."""
    return signal.sosfilt(signal.butter(12, 16490, fs=SR, output="sos"), x)


def record(dry):
    """The microphone loses deep bass and high treble; the loudest peaks are held below full scale."""
    def microphone(f):
        return 1j * f / (MIC_LOW_HZ + 1j * f) / np.sqrt(1 + (f / MIC_TOP_HZ) ** 40)

    heard = filtered(dry[0], microphone)[None]
    mix = heard / (1 + np.abs(heard) ** 8) ** (1 / 8)
    return low_pass(mix)


dry = scene()
out = record(dry)
master_out(out)
```